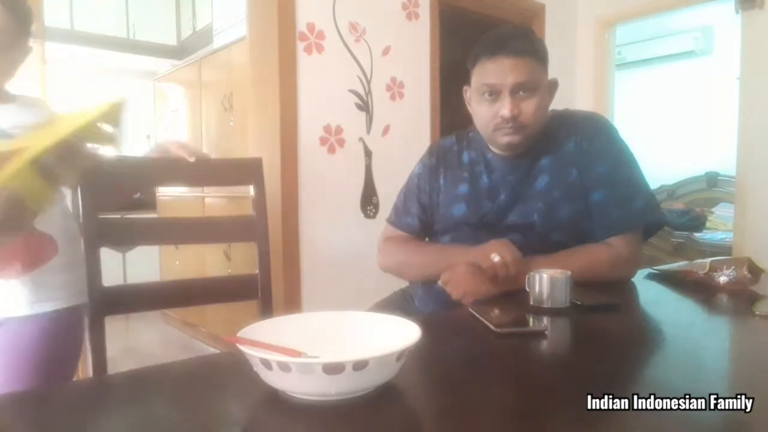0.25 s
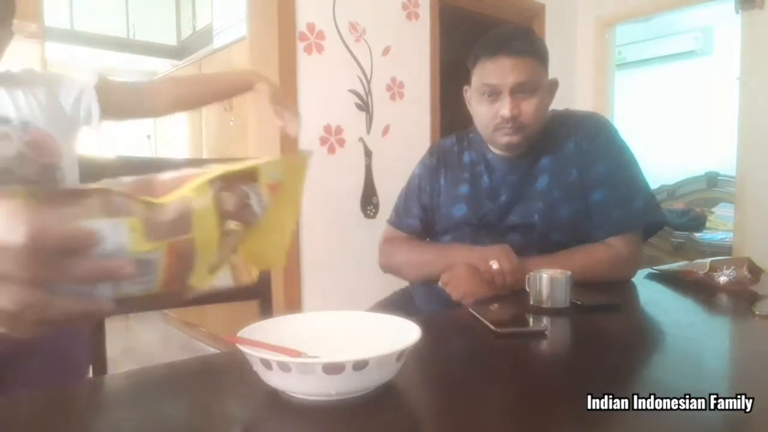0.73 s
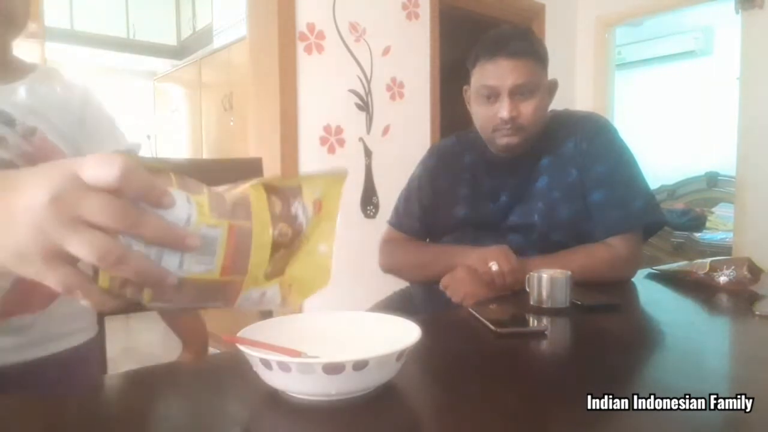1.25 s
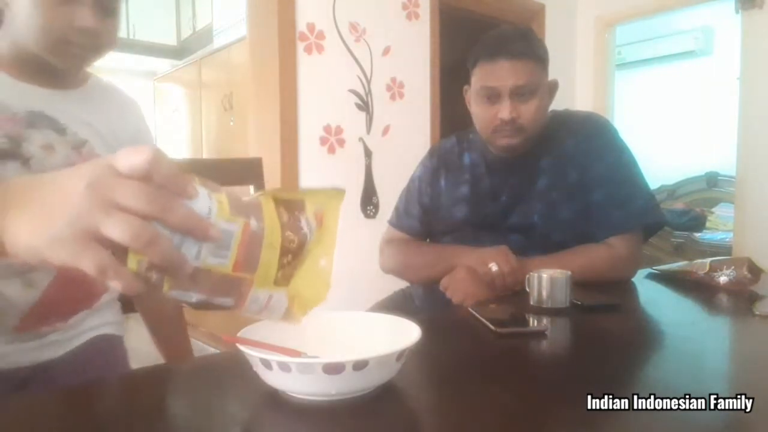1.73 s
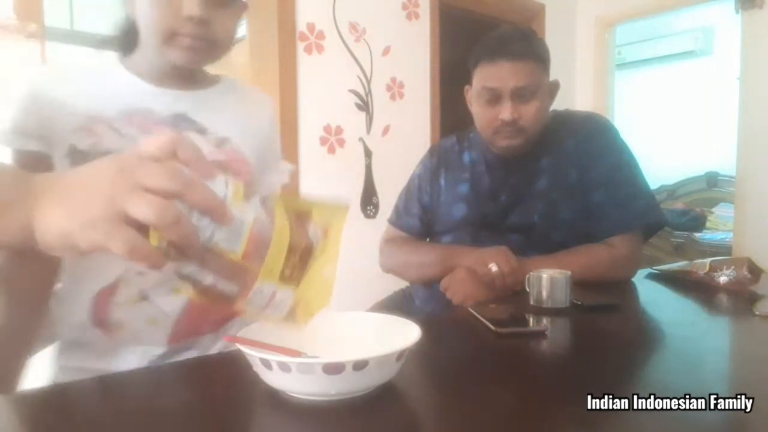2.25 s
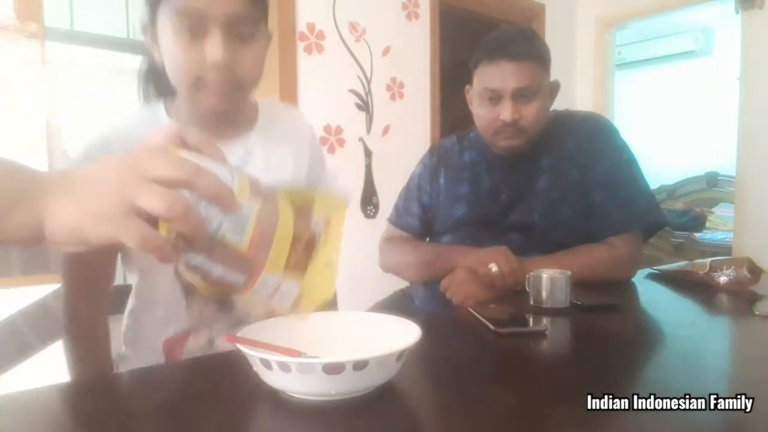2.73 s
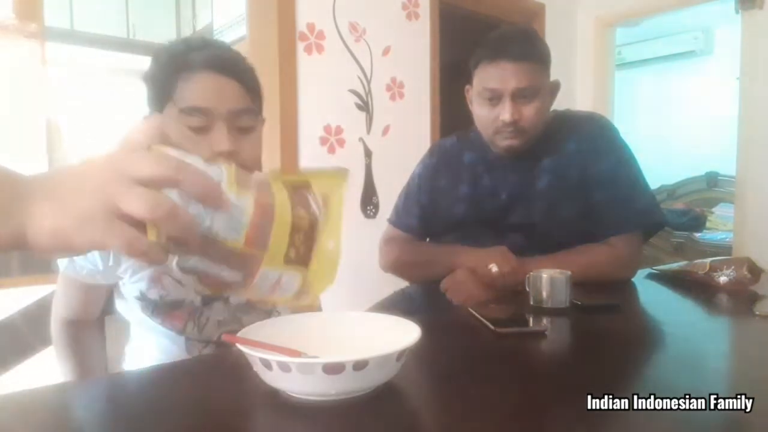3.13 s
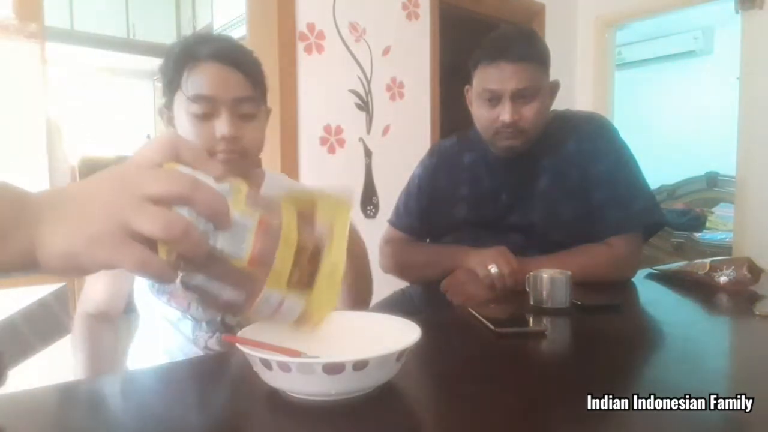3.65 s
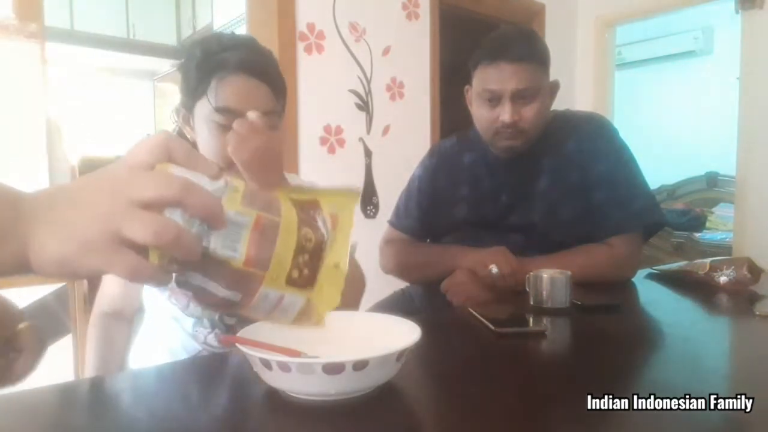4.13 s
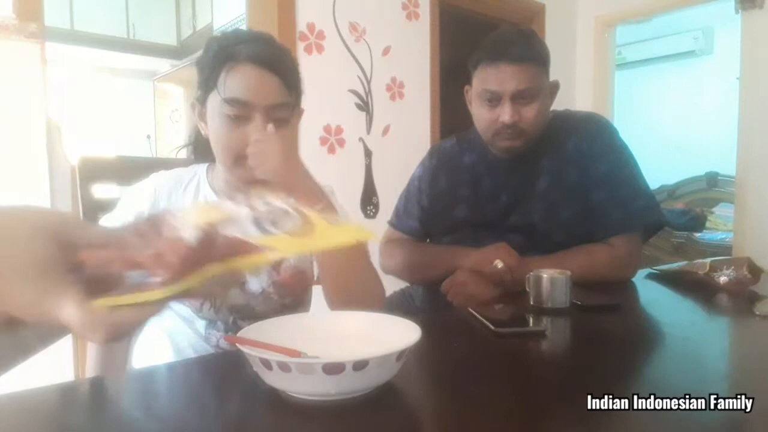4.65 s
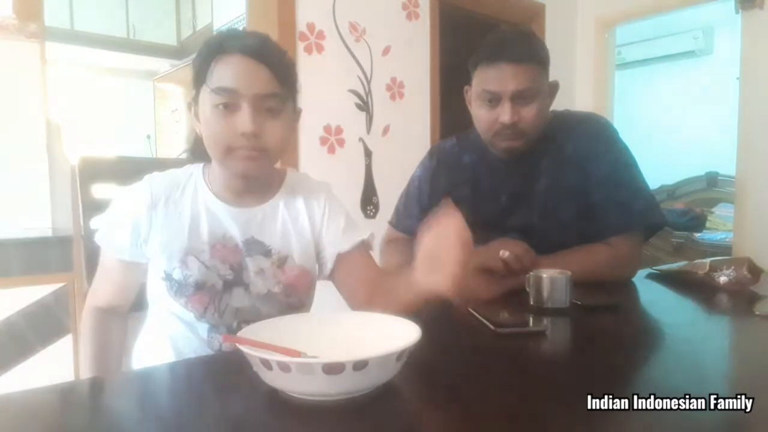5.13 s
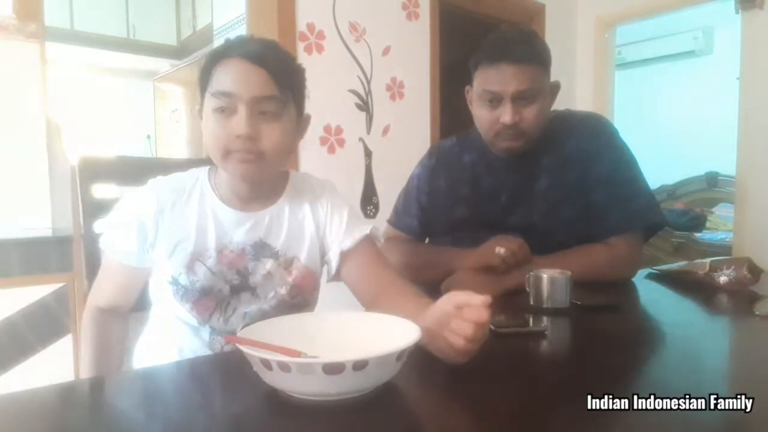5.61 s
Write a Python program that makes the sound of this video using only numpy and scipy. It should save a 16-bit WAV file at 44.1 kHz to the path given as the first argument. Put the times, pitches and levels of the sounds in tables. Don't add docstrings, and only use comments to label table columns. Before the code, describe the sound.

A thin plastic food packet crackles and rustles sharply as dry cereal is shaken into a ceramic bowl in a hard-floored room.

```python
import sys
import numpy as np
from scipy import signal
from scipy.fft import rfft, irfft
from scipy.io import wavfile
from scipy.ndimage import uniform_filter1d

SR = 44100
rng = np.random.default_rng(int(sys.argv[2]) if len(sys.argv) > 2 else 0)


def volts(x):
    e = np.asarray(x, float) / 20
    return 10 ** e


def output_pcm(signal):
    pcm = np.clip(np.atleast_2d(signal).T, -1, 1) * 32767
    wavfile.write(sys.argv[1], SR, np.round(pcm).astype(np.int16))


N = 259308

# start_s, peak_db, pitch_hz, tear_ms
SNAPS = [(0.0295, -32.5, 3630, 1.6), (0.2245, -38, 5500, 1.24), (0.3344, -41.5, 2040, 4.3),
         (0.3402, -36.5, 4630, 0.51), (0.4235, -36.5, 4350, 1.6), (0.5752, -32.5, 6700, 0.64),
         (0.5956, -36, 5130, 1.9), (0.6244, -36, 3720, 2.4), (0.7658, -26, 4240, 1.2),
         (0.8487, -30, 3980, 1.2), (0.9218, -26, 3000, 1.8), (0.9861, -20.5, 5700, 0.91),
         (1.1933, -31.5, 4220, 4.1), (1.2569, -28.5, 7540, 0.28), (1.4666, -25, 6140, 1.8),
         (1.5212, -24.5, 5800, 3), (1.5459, -12, 5770, 0.55), (1.5894, -25.5, 4250, 0.67),
         (1.6285, -23, 7460, 0.82), (1.7022, -25, 5550, 0.58), (1.7596, -34, 3250, 2.4),
         (1.814, -27.5, 2410, 1.6), (1.846, -24, 7450, 0.25), (1.878, -25, 7500, 0.14),
               (1.932, -23, 8050, 0.35), (1.9704, -29, 2620, 0.59), (2.018, -28.5, 7600, 0.74),
               (2.1037, -36.5, 2520, 3.6), (2.142, -24, 5840, 1.3), (2.2, -22.5, 2440, 3.7),
               (2.2426, -24, 5270, 0.58), (2.4468, -41, 3050, 1.8), (2.5172, -28.5, 4700, 0.72),
               (2.7917, -24.5, 2620, 0.31), (2.82, -30, 7860, 0.66), (2.85, -24, 2500, 0.37),
               (2.9877, -30, 5760, 0.82), (3.0878, -28.5, 4240, 2.8), (3.1422, -21, 2670, 0.8),
               (3.153, -18.5, 3980, 0.29), (3.286, -36, 3420, 0.45), (3.3216, -34.5, 5440, 0.98),
               (3.51, -27.5, 4800, 0.44), (3.534, -32, 3380, 0.81), (3.6662, -16, 4750, 0.79),
               (3.682, -26.5, 2260, 0.57), (3.732, -24, 2520, 1.6), (3.8, -26.5, 4640, 1.2),
               (3.8363, -27, 5450, 0.3), (3.9155, -37, 3950, 0.5), (3.9795, -37, 5150, 1),
         (4.134, -40.5, 5600, 2.2), (4.1964, -41, 3780, 1.7), (4.5577, -38, 2700, 2.1),
              (4.7047, -38, 3140, 2), (4.8127, -39, 1650, 1.7), (4.8776, -37, 1840, 4.2),
              (4.891, -34, 3420, 2), (4.985, -41, 3360, 0.58), (5.1744, -32.5, 1860, 0.54),
              (5.1977, -37, 4000, 1.3), (5.207, -22, 2850, 0.58), (5.2622, -19, 4000, 0.32),
              (5.2701, -28, 1740, 1.33), (5.321, -26, 5000, 1.3), (5.3428, -20, 3400, 1),
              (5.3729, -19, 5400, 0.44), (5.457, -25, 3650, 2.9), (5.497, -21.5, 3800, 0.77),
              (5.5038, -26.5, 2020, 3.1), (5.536, -27.5, 3750, 1.7), (5.5954, -27.5, 5860, 1),
              (5.6564, -31.5, 3660, 1.8), (5.6882, -32, 3850, 4.1), (5.8424, -22.5, 6300, 1.2),
              (5.8732, -25, 5030, 1.5),
         (.1113, -43.5, 3350, 0.45), (0.1914, -50, 2240, 0.46), (.3541, -49, 5340, .6),
         (0.568, -38, 1970, 0.65), (1.217, -31, 6580, 0.86), (1.4284, -43, 4000, 0.66),
         (1.483, -32, 5460, 0.98), (1.689, -38, 4860, .6), (1.714, -38, 5600, .6),
         (1.7934, -34, 5680, 0.68), (1.8379, -24.5, 6900, .6), (1.8626, -29, 4900, 0.74),
         (2.192, -27, 4260, 1.2), (2.3085, -39, 4130, .6), (2.3244, -36, 4070, .6),
         (2.4924, -33, 5420, 0.68), (2.5236, -34, 4500, 0.68), (2.651, -31, 5600, 2.5),
         (2.8035, -25, 4360, 0.86), (2.835, -28, 6600, 0.75), (2.865, -24, 3800, 0.44),
         (3.1172, -23.5, 2410, 0.43), (3.166, -27, 4000, 0.48), (3.698, -34, 4500, 0.46),
         (3.898, -36.5, 5060, 1.7), (4.0496, -41, 3700, 0.54), (4.2777, -47, 3310, .6),
         (4.5155, -45, 7010, 0.65), (4.532, -45, 5500, 0.51), (4.5739, -35, 2350, 0.72),
         (4.5826, -41, 2520, 0.96), (4.6375, -42, 2080, 0.43), (4.68, -42.5, 3980, .6),
         (4.7766, -41.5, 3730, 0.87), (4.908, -41, 4000, .6), (5.2346, -31, 3480, .6),
         (5.2433, -37.5, 3310, 0.66), (5.3058, -31, 4850, 0.44), (5.356, -32, 3330, 1.5),
         (5.521, -29, 7400, 0.71), (5.8316, -39, 4950, 0.45), (5.8586, -33, 3160, 0.72)]
# start_s, end_s
BRIGHT_CRACKS = [(.762, .772), (.983, .993), (1.463, 1.472), (1.543, 1.551), (1.811, 1.82), (3.15, 3.158),
                 (3.663, 3.672), (5.204, 5.213), (5.26, 5.277), (5.369, 5.378), (5.494, 5.503),
                 (5.592, 5.601), (5.84, 5.85)]
# peak_s, rustle_db, swell_20db_s, fade_20db_s
SQUEEZES = [(0.0, -40.5, .05, 0.16), (.339, -57.5, 0.45, 0.8), (.434, -58, 0.2, 0.2),
            (.591, -48, 0.09, 0.33), (.772, -42.5, -0.01, 0.26), (.852, -50, -0.02, 0.17),
            (.925, -48.5, -0.1, 0.3), (.998, -50.5, -0.1, 0.24), (1.197, -40, 0.05, 0.12),
            (1.25, -48, 0.17, 0.24), (1.474, -37.5, 0.04, 0.24), (1.55, -41.5, 0.08, 0.27),
            (1.705, -47.5, 0, 0), (1.816, -41.5, 0.05, -1.2), (1.842, -40.5, 0.04, 0.16),
            (1.96, -45.5, 0.1, 0.37), (2.143, -42.5, 0.15, .15), (2.202, -34.5, 0.06, 0.1),
            (2.31, -49, 0.5, 0.1), (2.45, -48.5, .02, -1.2), (2.522, -45.5, 0.17, 0.66),
            (2.651, -43.5, 0.2, 0.26), (2.805, -37, 0.05, 0.34), (2.985, -34, -0.05, 0.04),
            (2.93, -45, -0.1, 0.4), (3.09, -44, -0.2, 0.27), (3.154, -35.5, 0.13, 0.13),
            (3.335, -44, 0.67, 0.15), (3.515, -47, 0, 0.5), (3.676, -38.5, 0.05, 0.15),
            (3.735, -45.5, 0.1, .2), (3.829, -47.5, 0.27, .4), (3.96, -53, -2.3, .1),
            (4.12, -52, 0.1, 0.19), (4.2, -60.5, -1, 0.19), (4.298, -57, -1, 0), (4.575, -51, 0.06, 0.33),
            (4.7, -54.5, .15, 0.47), (4.81, -52, 0.14, 0.26), (4.895, -46.5, 0.11, 0.22),
            (5.208, -51, 0.28, 0.3), (5.27, -42, 0.04, 0.07), (5.35, -37, 0.1245, 0.06),
            (5.457, -37.5, 0.05, 0.13), (5.51, -44, 0.16, -0.01), (5.6, -48, 0.28, 0),
            (5.66, -50, 0.25, -0.03), (5.695, -45.5, 0.13, 0.05), (5.846, -45.5, 0.06, 0.4)]
# time_s, sheen_db
RUSTLE_SHEEN = [(0.0, -15.5), (.43, -18.5), (1.0, -14.5), (1.25, -15), (1.5, -10.5), (1.9, -10), (2.1, -14),
                (2.55, -17.5), (2.68, -16), (2.85, -16), (3.15, -14.5), (3.45, -21.5), (3.8, -11.5),
                (4.2, -17.5), (4.55, -19), (4.8, -20), (5.2, -16.5), (5.88, -19)]
# freq_hz, density_db_per_hz
FILM_SPECTRUM = [(530, -46.5), (900, -5), (1610, -1.5), (2480, 0.5), (2820, 1), (4490, 1), (5580, 1),
                 (7570, -1.5), (9500, -12), (12400, -26), (20900, -120)]
# peak_s, load_db, swell_20db_s, fade_20db_s
SLIDES = [(0.0, -59, .1, 0.17), (.35, -63.5, 0.16, 0.4), (.434, -57, 0.12, .15), (.591, -54, 0, 0.5),
          (.778, -53.5, -0.04, 0.42), (1.197, -51, 0.06, 0.22), (1.49, -49, 0.03, 0.45),
          (1.843, -48.5, 0.01, 0.26), (2.1, -58.5, .5, -0.4), (2.21, -50, 0.42, 0.15),
          (2.5, -53.5, 0.37, -0.05), (2.651, -48.5, .1, 0.43), (2.84, -51, 0.26, 0.9),
          (3.0, -46.5, 0.22, 0.45), (3.2, -49, 0.4, 0.38), (3.522, -51, 0, .5), (3.69, -55, 0, 0.3),
          (3.84, -55.5, 0.3, .5), (4.131, -58, 0.3, 0.24), (4.298, -65, 0, 0.8), (4.57, -51.5, 0.05, .2),
          (4.904, -53, 0.1, 0.36), (5.35, -47.5, 0.18, 0.27), (5.505, -46, 0.13, .2),
          (5.695, -47, 0.1, 0.1), (5.879, -44.5, 0.01, -2)]
# freq_hz, density_db_per_hz
LOAD_SPECTRUM = [(35, -19), (60, -29), (111, -4.5), (404, 3), (453, -2.5), (674, 3.5), (962, -2),
                 (1800, -1.5), (2340, -51), (3960, -120)]
# start_s, peak_db, pitch_hz, rise_ms
BUMPS = [(0.759, -72.5, 88.8, 8), (1.199, -72, 88, 6.5), (1.549, -63.5, 70.5, 8), (1.739, -57, 88.8, 5.4),
         (1.789, -54.5, 80, 8), (1.858, -59, 74, 14), (2.124, -74.5, 88.8, 8), (3.139, -60, 37.7, 10),
         (4.429, -65, 88.8, 8.3), (5.109, -71, 63, 8.2), (5.298, -62, 67.3, 10), (5.469, -58, 88.8, 6.7),
         (5.519, -61, 69.5, 11)]
# start_s, peak_db, pitch_hz, rise_ms
BOOMS = [
    (.11, -69, 410, 19),
    (2.061, -55, 205.5, 29),
    (2.067, -61, 112, 21),
    (2.197, -38.5, 686, 5.1),
    (3.051, -58, 115, 41),
    (3.13, -48.5, 264, 20),
    (4.48, -58.5, 409, 13),
    (4.561, -62, 336, 17),
]
# time_s, level_db
POUR = [
    (1.4, -101),
    (1.8, -67.5),
    (2.15, -58),
    (2.3, -73),
    (2.6, -60.5),
    (3.15, -60),
    (3.4, -66),
    (4.1, -65),
    (4.4, -101),
]
# freq_hz, level_db, t60_s
BOWL_MODES = [(379, 1, 0.048), (718, -5.5, 0.21), (1740, -46, .05), (2410, -2.5, 0.13), (3730, -14, 0.09),
              (5460, 3.5, 0.018)]
# freq_hz, t60_s
ROOM_T60 = [(125, 0.32), (500, 0.41), (1500, 0.52), (4000, 0.4), (8000, 0.34), (14000, 0.47)]
# freq_hz, level_db
AIR_SPECTRUM = [(24, -74), (40, 7.5), (249, 4.5), (320, -1.5), (1180, -20.5), (1370, -5.5), (3830, -2.5),
                (7000, -6), (10400, -31), (16000, -95)]
# freq_hz, level_db
LINE_FLOOR = [(30, -100), (90, -100), (200, -125), (8000, -125), (9200, -104), (13000, -104), (15500, -97),
              (16200, -56)]
# freq_hz, level_db
STEREO_ERROR = [(30, -3), (250, -13.5), (1000, -14), (4000, -12.5), (8000, -9.5), (14000, -5)]
# start_s, end_s
MONO_SPANS = [(0.983, 1.008), (1.197, 1.26), (1.527, 1.634), (1.754, 1.793), (1.826, 1.976), (2.1, 2.145),
              (2.193, 2.215), (2.497, 2.534), (2.714, 2.764), (2.916, 2.958), (2.988, 3.028), (3.115, 3.14),
              (3.335, 3.395), (5.258, 5.283), (5.358, 5.393), (5.49, 5.577)]
# start_s, end_s
DULL_SPANS = [(0.062, 0.075), (1.429, 1.439), (2.06, 2.075), (2.524, 2.537), (2.599, 2.661), (2.681, 2.749),
              (2.873, 2.936), (2.966, 2.976), (3.016, 3.026), (3.058, 3.071), (3.245, 3.258),
              (3.312, 3.352), (3.407, 3.42), (3.534, 3.557), (3.589, 3.607), (3.991, 4.008), (4.22, 4.233),
              (4.288, 4.355), (4.378, 4.43), (4.435, 4.522), (4.527, 4.602), (4.682, 4.697), (4.729, 4.744),
              (4.869, 4.891), (4.909, 4.921), (5.056, 5.076), (5.126, 5.138), (5.577, 5.59), (5.622, 5.65),
              (5.707, 5.727), (5.732, 5.827), (5.832, 5.847)]
# start_s, end_s
HOLLOW_SPANS = [
    (1.44, 1.452),
    (2.524, 2.537),
    (3.985, 4.002),
    (5.838, 5.848),
]

SMALL_SNAP_COUNT, SMALL_SNAP_DB, SMALL_SNAP_SPREAD_DB = 30, 6, -2
SNAP_SHEEN_DB, BRIGHT_SHEEN_DB = -13.5, 4.5
ROOM_DB, ROOM_GAP_S = -3, 0.00052
AIR_DB = -69.5
TOP_HZ, TOP_SAG_HZ = 16480, 1450


def rms_one(x):
    return x / np.sqrt(np.mean(x ** 2) + 1e-20)


def in_time(rows):
    s, *columns = np.transpose(rows)
    return [np.interp(np.arange(N) / SR, s, c) for c in columns]


def at_hz(points, hz):
    points = np.array(points)
    return np.interp(np.log(hz), np.log(points[:, 0]), points[:, 1])


def within(spans, s):
    return np.any([(s > start) & (s < end) for start, end in spans], axis=0)


def shut(spans, edge_s):
    return uniform_filter1d(1. - within(spans, np.arange(N) / SR), size=round(edge_s * SR))


def colour(x, spectrum, size=4096):
    hz = np.linspace(1, SR / 2, size // 2 + 1)
    cepstrum = irfft(np.log(volts(at_hz(spectrum, hz))))
    cepstrum[1:size // 2] *= 2
    cepstrum[size // 2 + 1:] = 0
    return signal.fftconvolve(x, irfft(np.exp(rfft(cepstrum))))[:len(x)]


def band(x, low_hz, high_hz):
    edges_hz = np.clip([low_hz, high_hz], 10, .45 * SR)
    return signal.sosfilt(signal.butter(2, edges_hz, "band", fs=SR, output="sos"), x)


def drift(rate_hz):
    r = np.exp(-80 * np.pi * rate_hz / SR)
    slow = signal.lfilter([1], [1, -2 * r, r * r], rng.standard_normal(N // 40 + 2002))[2000:]
    return np.interp(np.arange(N) / 40, np.arange(len(slow)), rms_one(slow))


def ring(clicks, hz, t60_s):
    r, w = volts(-60 / (t60_s * SR)), 2 * np.pi * hz / SR
    return signal.lfilter([0, np.sin(w)], [1, -2 * r * np.cos(w), r * r], clicks + 1e-18)


def grains(per_s, spread_db, clump_db):
    sizes = volts(spread_db * np.minimum(rng.exponential(1, N), 4)) * rng.choice([-1, 1], N)
    return sizes * (rng.random(N) < per_s * volts(clump_db * drift(25)) / SR)


def crinkle(clicks, low_hz, high_hz, cycles, count):
    dealt = rng.integers(0, count, N)
    pitches_hz = np.geomspace(low_hz, high_hz, count)
    return sum(hz * ring(clicks * (dealt == k), hz, cycles / hz) for k, hz in enumerate(pitches_hz))


def handling(moves):
    t = np.arange(0, N + 32, 32) / SR
    s, db, swell_s, fade_s = np.transpose(moves)[:, :, None]
    down_db = 20 * np.where(t < s, (s - t) / np.abs(swell_s), (t - s) / np.abs(fade_s))
    total_db = 10 * np.log10(np.sum(volts(db - down_db) ** 2, axis=0))
    return np.interp(np.arange(N) / SR, t, total_db)


def snaps(rows, size=1500):
    out = np.zeros((2, N + size))
    ms = np.arange(size) / SR * 1000
    noise = rng.standard_normal((len(rows), size))
    for (s, peak_db, hz, tear_ms), slips in zip(rows, noise):
        age = ms / np.clip(tear_ms, .15, 5)
        slips = slips * np.abs(slips) ** 0.11 * np.sqrt(age) * np.exp(-age)
        body = rms_one(band(slips, max(hz / 2.3, 1100), min(hz * 2.5, 9000)))
        sheen_db = SNAP_SHEEN_DB + BRIGHT_SHEEN_DB * within(BRIGHT_CRACKS, s)
        sheen = volts(sheen_db) * rms_one(band(slips, 9000, 15500))
        low = volts(-15.0) * rms_one(band(slips, 360, 1330))
        crack = volts(1.5) * (body + sheen) + low
        facet = rms_one(ring(slips, hz, 0.0048))
        at = round(s * SR)
        out[:, at:at + size] += volts(peak_db) * np.array([facet, crack]) / np.abs(facet + crack).max()
    return out[:, :N]


def small_snaps(rustle_db):
    when, size, pitch, tear = rng.random((SMALL_SNAP_COUNT, 4)).T
    at = (when * N).astype(int)
    peak_db = rustle_db[at] + SMALL_SNAP_DB + SMALL_SNAP_SPREAD_DB * (size - .5)
    return list(zip(at / SR, peak_db, 2000 * 3.7 ** pitch, 0.29 * 5.5 ** tear))


def rustle(rustle_db, sheen_db):
    clicks = grains(2500, spread_db=1.3, clump_db=2.5)
    facets = colour(crinkle(clicks, 900, 9000, cycles=7.0, count=16), FILM_SPECTRUM)
    sheen = band(band(clicks, 10260, 13060), 8800, 16500)
    return volts(rustle_db - 4) * (rms_one(facets) + volts(sheen_db + 4.0) * rms_one(sheen))


def load(load_db):
    clicks = grains(900, spread_db=1.5, clump_db=4)
    lumps = crinkle(clicks, 89.4, 1490, cycles=11.1, count=14)
    return volts(load_db - 2.0) * rms_one(colour(lumps, LOAD_SPECTRUM))


def bowl():
    hits = grains(250, spread_db=2.5, clump_db=4.0)
    modes = sum(ring(hits * volts(db + rng.normal(0, 4, N)), hz, t60_s) for hz, db, t60_s in BOWL_MODES)
    return volts(in_time(POUR)[0]) * rms_one(modes)


def bumps():
    out, t = np.zeros(N), np.arange(SR // 4) / SR
    for s, peak_db, hz, rise_ms in [*BUMPS, *BOOMS]:
        age, at = t * 1000 / rise_ms, round(s * SR)
        out[at:at + len(t)] += volts(peak_db) * age * np.exp(1 - age) * np.cos(2 * np.pi * hz * t)
    return out


def room(x):
    t = np.arange(SR) / SR
    noise = rng.standard_normal((4, SR))
    tails = np.zeros((4, SR))
    for hz in 62.5 * 2. ** np.arange(9):
        octave = band(noise, hz / np.sqrt(2), hz * np.sqrt(2))
        tails += octave * volts(-60 * t / at_hz(ROOM_T60, hz))
    tails *= 1 - np.exp(-(t / ROOM_GAP_S) ** 2)
    place = np.arange(N) // (SR // 10) % 4
    out = np.zeros(N)
    for k, tail in enumerate(tails):
        out += signal.fftconvolve(x * (place == k), tail / np.sqrt(np.sum(tail ** 2)))[:N]
    return volts(ROOM_DB) * out


def still_air():
    return volts(AIR_DB) * rms_one(colour(rng.standard_normal(N), AIR_SPECTRUM))


def scene():
    rustle_db, (sheen_db,) = handling(SQUEEZES), in_time(RUSTLE_SHEEN)
    rows = [*SNAPS, *small_snaps(rustle_db)]
    facet, crack = snaps(rows)
    table = crack + rustle(rustle_db, sheen_db) + load(handling(SLIDES)) + bowl()
    mix = facet + table + room(table + volts(-3.0) * facet) + still_air()
    heard = band(band(mix, 94, 21000), 89, 21000) + bumps()
    return np.array([heard, heard])


def thin(mono):
    frames, lead = dict(window="cosine", nperseg=2048, noverlap=1024), 162
    hz, s, lines = signal.stft(np.pad(mono, (lead, 0)), SR, **frames)
    hz, count, size = hz[:, None] + 1, len(s), np.abs(lines)
    by_band = np.repeat(rng.random((2, 65, count)), 16, axis=1)[:, :len(hz)]
    around = uniform_filter1d(size, size=32, axis=0)
    step = around * volts(-4 + 5 * rng.standard_normal(count) + 11 * by_band[0])
    kept = size > step * (hz > 8900)
    kept &= size > volts(at_hz(LINE_FLOOR, hz) + 3.0 * rng.standard_normal(count))
    kept &= hz < TOP_HZ - TOP_SAG_HZ * rng.exponential(1, count)
    share = np.clip(rng.normal(0.65, 0.25, count), .1, 1)
    apart = (by_band[1] < share) & (size > around * volts(-3.0))
    error_db = at_hz(STEREO_ERROR, hz) + 2.4 * rng.standard_normal(count)
    error = apart * volts(error_db) * np.exp(2j * np.pi * rng.random(lines.shape))
    return [signal.istft(v, SR, **frames)[1][lead:lead + N] for v in (lines * kept, lines * kept * error)]


def smooth(x, order, hz, kind="low"):
    return signal.sosfiltfilt(signal.butter(order, hz, kind, fs=SR, output="sos"), x)


def band_limit(x):
    return signal.sosfilt(signal.butter(12, 16650, fs=SR, output="sos"), x)


def record(dry):
    mid, side = thin(dry[0])
    treble = smooth([mid, side], 8, 9100, "high")
    mid, side = [mid, side] - .93 * treble * (1 - shut(DULL_SPANS, .012))
    whole = smooth(dry[0], 12, 15800)
    mid = whole + (mid - whole) * shut(BRIGHT_CRACKS, .003)
    lows = smooth([mid, side], 6, 1800)
    mid, side = [mid, side] - .85 * lows * (1 - shut(HOLLOW_SPANS, .006))
    side = side * shut(MONO_SPANS, .012)
    return band_limit(np.array([mid + side, mid - side]))


dry = scene()
out = record(dry)
output_pcm(out)
```